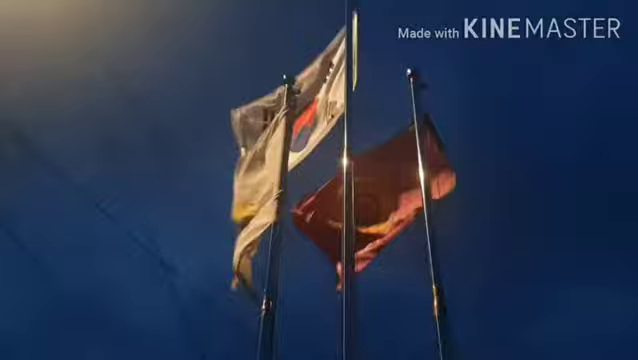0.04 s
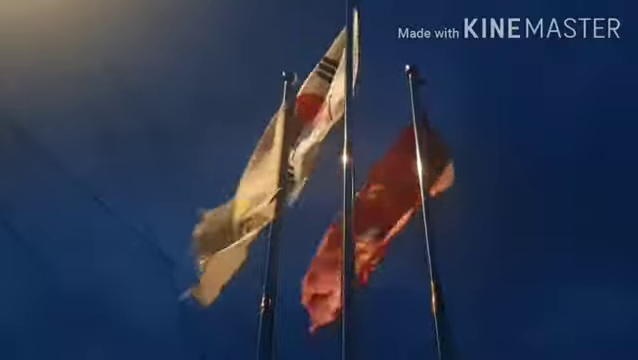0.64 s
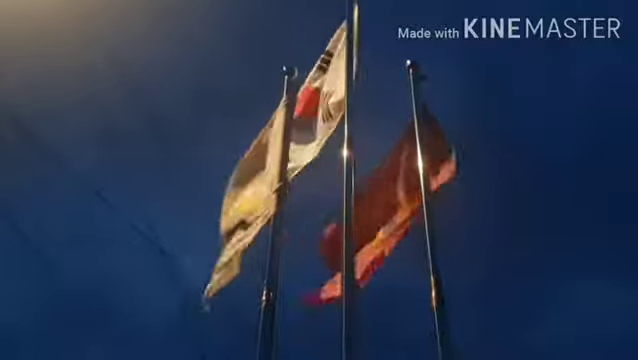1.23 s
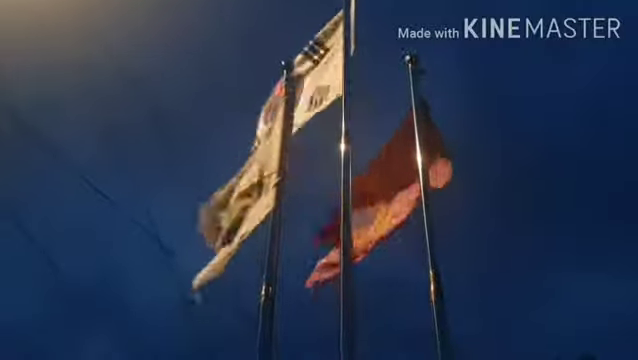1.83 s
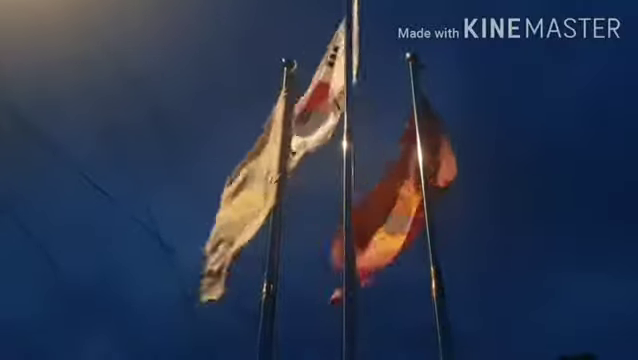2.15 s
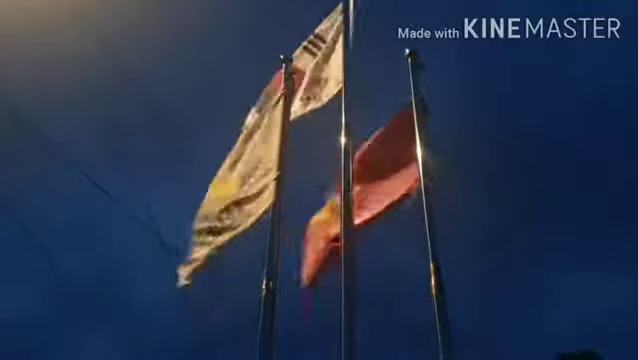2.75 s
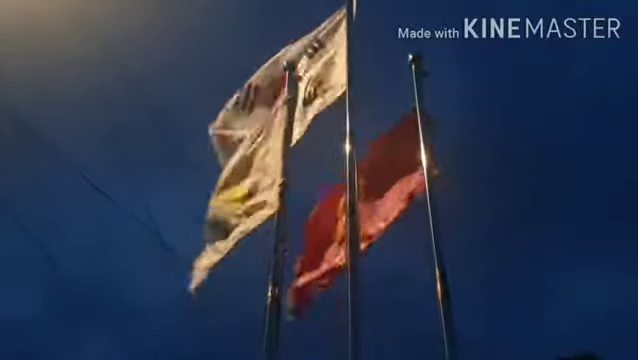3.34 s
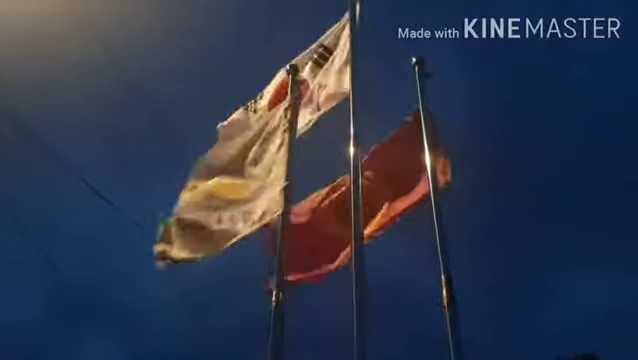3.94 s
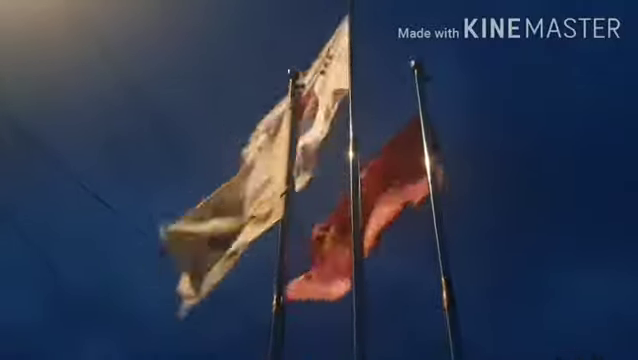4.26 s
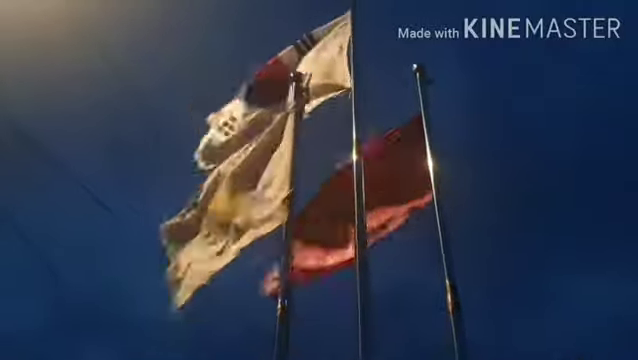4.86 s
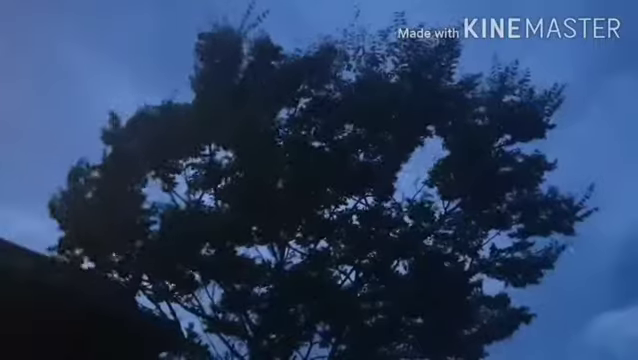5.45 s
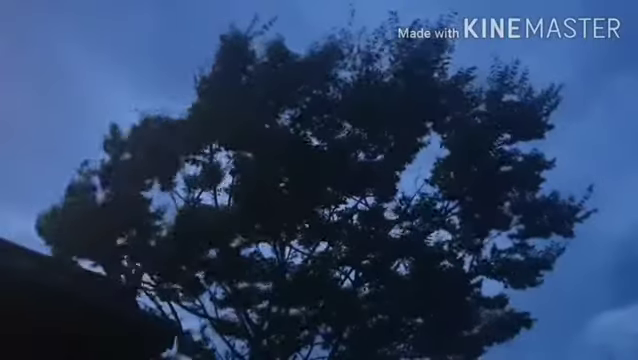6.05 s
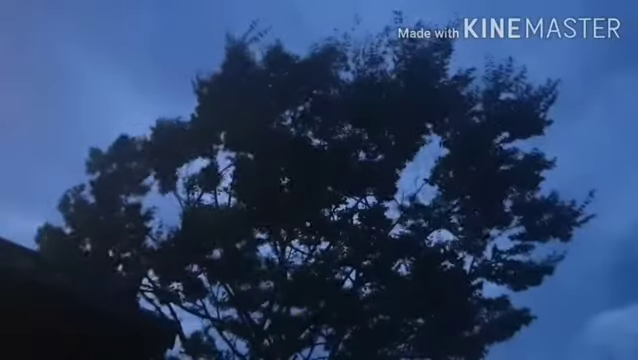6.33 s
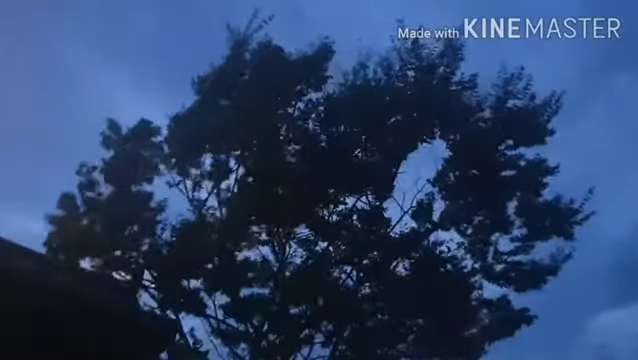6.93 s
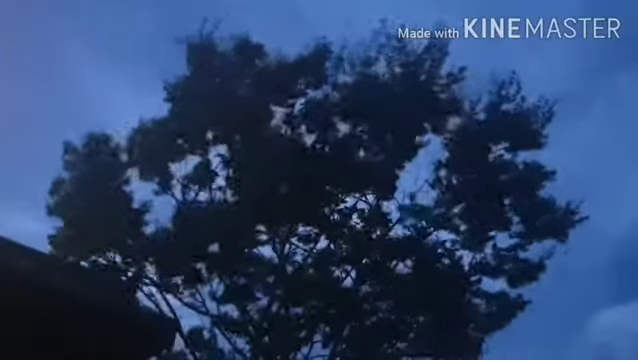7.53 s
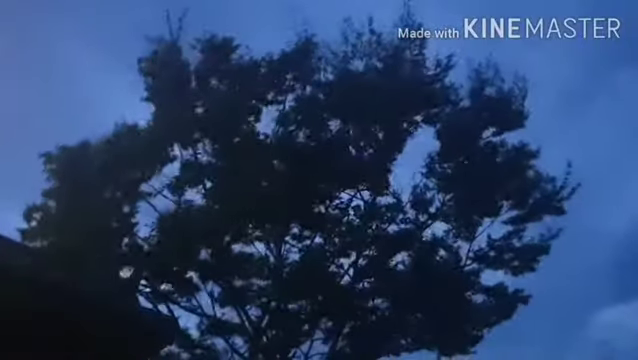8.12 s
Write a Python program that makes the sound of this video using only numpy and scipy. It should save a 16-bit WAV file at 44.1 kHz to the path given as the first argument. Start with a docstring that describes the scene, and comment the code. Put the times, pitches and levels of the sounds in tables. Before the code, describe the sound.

Outdoors under flagpoles, uneven gusts buffet the microphone with a low, fluttering rumble. Quieter clinks of clips on ringing metal poles come through, along with faint cloth swishes and rope rubbing. After a sharp double clink, the pole sounds stop abruptly and the wind briefly drops. Then the hiss of tossing leaves builds close by, under more heavy thumps of wind.

```python
"""Strong wind thumps and flutters right on the microphone, its eddies pushing at the two ports.
We stand at dusk under three flagpoles, with trees washing in the distance: cloth swishes, halyards rub,
and the flags jerk their halyard clips against the ringing metal poles.
After a cut the microphone faces a tossing tree, still in the wind, where thousands of leaves
brush each other in a bright rush that swells with the gusts."""
import sys
import numpy as np
from scipy import signal
from scipy.fft import rfft, irfft, next_fast_len
from scipy.io import wavfile
from scipy.ndimage import uniform_filter1d

SR = 44100
rng = np.random.default_rng(int(sys.argv[2]) if len(sys.argv) > 2 else 0)


def pcm_store(signal):
    """Save signal as 16-bit PCM."""
    levels = np.round(np.clip(np.atleast_2d(signal), -1, 1) * 32767)
    wavfile.write(sys.argv[1], SR, levels.astype(np.int16).T)


N = 361179
TIME = np.arange(N) / SR
START_S, CUT_S, RESUME_S = .16, 4.88, 4.885

# distant trees around the flagpoles: (time [s], relative level [dB])
FAR_TREE_LEVELS = [(.27, -71), (.5, -68), (.7, -69), (.85, -69.5), (1.6, -71), (2.0, -69), (2.15, -62.5),
                   (2.7, -63), (3.1, -64), (4, -62), (4.3, -62.5), (4.87, -62.5)]
# folds of flag sliding, halyards rubbing: (peak time [s], length [s], relative level [dB])
SWISHES = [(.48, .08, -78), (.64, 0.11, -78), (.76, 0.073, -81), (1.04, 0.091, -80), (2.66, 0.1, -66),
           (3.3, .025, -66), (3.45, 0.13, -85), (3.57, 0.066, -69), (4.19, 0.13, -72), (4.84, 0.098, -68)]
RUBS = [(2.77, .1, -69), (3.32, 0.087, -70), (3.5, .12, -81), (3.7, 0.13, -73), (3.9, 0.27, -69.5),
        (4.82, 0.059, -56.5)]
# clips striking the poles: (time [s], relative level [dB], pole ring offset [dB], chatter t60 [s])
CLIP_STRIKES = [(0.4362, -57.5, -5, 0.12), (0.609, -64, -3, .16), (0.9933, -64, -5, 0.14),
                (1.234, -63, -12, 0.1), (1.868, -68, -12, .08), (2.281, -51, -9, 0.14),
                (2.427, -46.5, 5, 0.14), (2.5986, -50.5, 8, 0.14), (2.634, -55, -6, 0.046),
                (2.728, -49.5, 7, .14), (2.762, -54, 7, 0.27), (3.148, -58, -10, .08),
                (3.2947, -58.5, -9, .14), (3.373, -49.5, -19, 0.058), (3.415, -52, -19, 0.046),
                (3.534, -52, -6, .13), (3.699, -51.5, -5, 0.2), (3.781, -55.5, -9, .14),
                (3.907, -61, -12, 0.14), (4.091, -52.5, 11, 0.19), (4.12, -50, -11, 0.052),
                (4.2557, -54, 0, .1), (4.299, -50.5, 11, .14), (4.402, -34, 7, 0.1), (4.4166, -34, 0, 0.11),
                (4.779, -46.5, 8, 0.18)]
# modes of pole and steel clip: (frequency [Hz], spread [Hz], relative level [dB], t60 [s])
POLE_MODES = [(1529, 30, -17, 1.2), (2110, 60, -11, 2.0), (3330, 50, -19, .9), (3830, 50, -13, .7),
              (3915, 42, -8, 1.0), (4060, 100, -9, .8), (6277, 28, -7, .55), (6471, 60, -10, .5),
              (9260, 90, -5, .35), (9700, 120, -8, .35)]
CLIP_MODES = [(4500, 14, -3.5, .25), (4720, 110, -9, .2), (5190, 16, -6, .22), (6520, 170, -5, .16),
              (7620, 110, -5, .1), (8090, 16, -1, .18), (9330, 130, 2.5, .16), (10300, 200, -2, .15),
              (11610, 120, -7, .1), (12728, 16, -8, .22), (13110, 130, -9, .1)]
# the tree in front of the microphone: (time [s], relative level [dB])
NEAR_TREE_LEVELS = [(4.93, -81), (4.97, -70), (5.06, -67), (5.13, -59), (5.27, -56), (5.37, -60.5),
                    (5.52, -56.5), (5.65, -52), (5.78, -55), (5.95, -53.5), (6.08, -54.5), (6.5, -51.5),
                    (6.66, -50.5), (6.73, -50.5), (6.8, -50.5), (6.87, -47.5), (7.0, -50), (7.1, -49),
                    (7.2, -53.5), (7.3, -51), (7.58, -54), (7.66, -51), (7.74, -53), (7.85, -55),
                    (8.08, -50.5), (8.19, -52.5)]
# steady wind on the microphone: (time [s], rumble [dB], buffeting [dB])
WIND_AT_FLAGS = [(.16, -50.5, -71), (.25, -37, -64), (.45, -40.5, -57), (.7, -44.5, -59.5), (.95, -39, -51),
                 (1.38, -33, -45.5), (1.6, -35, -39), (1.75, -39, -48), (2.2, -33, -41.5),
                 (2.4, -24.5, -33.5), (2.8, -31, -44), (3.0, -29, -45.5), (3.25, -31.5, -41),
                 (3.9, -34, -41.5), (4.13, -35, -45), (4.25, -27, -40.5), (4.55, -30, -39),
                 (4.75, -31.5, -49), (4.88, -34.5, -52)]
WIND_AT_TREE = [(4.93, -70, -68.5), (5.1, -61, -56), (5.35, -44.5, -50), (5.7, -39, -50.5),
                (5.95, -39, -52), (6.2, -41, -55), (6.35, -46, -56), (6.6, -29.5, -44), (6.88, -43, -46),
                (6.96, -45.5, -53), (7.25, -36.5, -52), (7.49, -42, -56), (7.65, -37, -55),
                (7.85, -37, -46), (8.08, -26.5, -41.5), (8.19, -48, -54)]
# gusts wrapping round both ports: (peak time [s], length [s], rumble [dB], buffeting [dB])
GUSTS = [(0.293, 0.092, -45, -45.5), (0.534, 0.036, -48, -46), (0.962, 0.038, -33, -44),
         (1.037, 0.03, -31.5, -50), (1.306, 0.035, -30, -36.5), (1.423, 0.041, -32.5, -31.5),
         (1.524, 0.028, -31, -35), (1.786, 0.025, -28, -42), (1.886, 0.025, -29, -44),
         (2, 0.08, -36.5, -38.5), (2.179, 0.029, -28, -39), (2.294, 0.041, -25, -23),
         (2.368, 0.027, -26.5, -25), (2.422, 0.021, -26, -34), (2.536, 0.019, -40, -23),
         (2.599, 0.1, -26, -26.5), (2.738, 0.099, -39, -30.5), (3.101, 0.05, -32, -31),
         (3.233, 0.031, -28, -30.5), (3.322, 0.016, -28.5, -45), (3.361, 0.04, -44, -31.5),
         (3.536, 0.034, -25, -38), (3.675, 0.085, -31.5, -31), (3.77, 0.087, -30.5, -31.5),
         (3.839, 0.034, -32, -35), (3.94, 0.041, -31, -34), (4.004, 0.026, -39, -31),
         (4.072, 0.026, -28.5, -31.5), (4.25, 0.025, -35, -34), (4.621, 0.023, -33, -41),
         (4.695, 0.032, -36, -34.5), (4.763, 0.021, -29, -34.5), (4.8, 0.023, -28, -38.5),
         (5.155, 0.098, -45, -56), (5.45, 0.07, -30, -45), (5.542, 0.045, -32, -44),
         (5.605, 0.03, -31.5, -46.5), (5.728, 0.053, -30.5, -38), (5.781, 0.045, -27, -30.5),
         (5.845, 0.057, -23.5, -26.5), (6.059, 0.0082, -36, -49), (6.456, 0.044, -26, -30.5),
         (6.554, 0.08, -32, -42), (6.703, 0.078, -27, -36), (6.853, 0.11, -32.5, -64),
         (7.035, 0.045, -35.5, -49), (7.151, 0.017, -46, -44), (7.268, 0.043, -43, -39.5),
         (7.413, 0.024, -47, -54), (7.545, 0.012, -35, -44), (7.602, 0.053, -53, -37),
         (7.702, 0.043, -50, -37), (7.763, 0.025, -52, -45), (7.842, 0.011, -52, -34),
         (7.941, 0.065, -49, -32.5), (8.023, 0.028, -41, -31.5), (8.112, 0.029, -20.5, -33)]
# flow tearing across the right port's edge: (start [s], length [s], relative level [dB])
TEARS = [(1.274, 0.018, -49), (1.4, 0.11, -51.5), (2.316, 0.031, -36.5), (2.371, 0.025, -33),
         (2.808, 0.15, -47.5), (4.144, 0.194, -40.5), (4.359, 0.2, -40.5), (5.767, 0.15, -55.5)]
# short rips of air at a port's edge: (start [s], length [s], level [dB], left minus right [dB])
RIPS = [(1.414, 0.0079, -58, -16), (1.486, 0.003, -47, -22), (1.494, 0.005, -45, -24),
        (1.519, .004, -52, -14), (1.803, 0.003, -54, -22), (2.309, 0.012, -42.5, -22),
        (2.331, 0.013, -39, -22), (2.37, 0.017, -39, -29), (2.412, 0.0084, -46, -22),
        (2.438, 0.0039, -36.5, -21), (2.445, 0.0061, -44.5, -22), (2.488, 0.013, -41.5, -24),
        (2.652, 0.02, -50, -15), (2.82, 0.0031, -36, -19), (2.831, 0.0097, -48, -20),
        (2.876, 0.0073, -38.5, -22), (2.893, 0.01, -40, -24), (2.934, 0.017, -47, -16),
        (3.289, 0.013, -51, -10), (3.666, 0.0027, -72, 5), (4.077, 0.011, -48, -15),
        (4.11, .006, -43.5, -9), (4.151, 0.0034, -40, -23), (4.157, 0.0068, -37, -23),
        (4.186, .003, -47, -20), (4.212, .004, -44, -16), (4.24, 0.0036, -44, -20), (4.26, .003, -41, -20),
        (4.28, 0.0048, -40, -23), (4.313, 0.011, -36.5, -25), (4.328, .008, -44, -18),
        (4.37, .004, -45, -22), (4.437, 0.0039, -52, -9), (4.447, 0.0029, -35.5, -29),
        (4.484, 0.023, -45, -24), (4.498, 0.016, -37.5, -22), (4.538, 0.014, -38.5, -14),
        (5.778, .008, -51, -3), (5.84, .008, -54, -8), (7.949, 0.0066, -55, -8), (8.024, 0.008, -43, 0)]
# single hard eddies: (time [s], relative level [dB], swing [Hz], left minus right [dB])
SHOVES = [(0.298, -26.5, 130, -4), (1.291, -27.5, 288, -2), (1.305, -24.5, 113, -3), (1.429, -23.5, 320, 9),
          (1.457, -17.5, 120, 4), (1.489, -26, 600, -14), (1.519, -25.5, 276, -2), (1.893, -26, 135, -5),
          (1.92, -23.5, 332, -3), (2.285, -20, 486, 3), (2.293, -26, 61, -13), (2.313, -16, 49, 5),
          (2.412, -17, 77, 4), (2.525, -12.5, 215, 3), (2.726, -18.5, 234, -4), (3.209, -22, 376, -19),
          (3.258, -24, 59.3, 1), (3.4, -20, 283, 3), (3.521, -38, 73.4, -13), (3.664, -20.5, 402, -2.5),
          (3.756, -32, 90, -8), (3.765, -26, 360, -5), (3.92, -28, 121, 0.5), (3.937, -27, 315, -10),
          (4.084, -15, 460, -32), (4.226, -19, 350, -18), (4.669, -20.5, 276, -2),
          (5.778, -11.5, 227, -1.5), (5.78, -14, 121, -13), (5.78, -22.5, 540, 4), (5.83, -23, 325, -3),
          (5.844, -16.5, 470, -6), (5.856, -14, 54.4, -1), (6.454, -36, 238, -4), (6.461, -26.5, 260, 5),
          (6.472, -21, 228, -1), (6.738, -25, 60.4, -1), (6.802, -17.5, 72, 0), (7.051, -30.5, 53.3, -3),
          (7.229, -34, 107, -19), (7.943, -23, 406, 3), (8.1, -18.5, 197, -4), (8.106, -18.5, 126, 4),
          (8.12, -20.5, 169, 4)]
# spectra as heard at the microphone: (frequency [Hz], relative level [dB])
FAR_TREE_TONE = [(30, -3.5), (400, 25.5), (900, 15.5), (1500, 7), (1900, -0.5), (2100, 1), (2700, -4),
                 (6000, -4.5), (7500, -2.5), (8300, -1.5), (10500, -3), (12500, -8.5), (15500, -20)]
CLOTH_TONE = [(700, -20), (1500, -4), (2700, 2), (3400, -3), (3800, -4), (5000, -3), (7000, -19),
              (12000, -14)]
RUB_TONE = [(1700, -40), (1980, -14), (2060, 0), (2170, -1), (2330, -10), (2500, -35), (3650, -35),
            (3830, -15), (4100, -13), (4300, -40)]
CHATTER_TONE = [(1000, -5.5), (3000, -6.5), (4400, -10.5), (5200, -8), (7000, -6.5), (9500, -5.5),
                (11500, -7.5), (13500, -15), (15500, -27)]
LEAF_TONE = [(600, 3.5), (1200, 3), (1900, -24), (2400, 0), (3200, -3), (5000, -1.5), (6200, 2.5),
             (7200, 1), (8300, 4.5), (9500, 2.2), (11800, 1), (14000, -5.5), (15500, -9.5)]
CROWN_TONE = [(40, 8), (300, -18), (700, 1.5), (1100, -7), (1600, -2), (2500, -1.5), (5000, -3.5),
              (12000, -40)]
RIP_TONE = [(150, -29), (400, 13), (900, 11), (1500, 5), (2200, -2.5), (3200, -14.5), (5000, -25),
            (10000, -50)]
RUMBLE_TONE = [(15, -17), (30, -13), (55, 1), (85, -1), (140, -5), (200, -11), (280, -21), (500, -52),
               (1000, -51), (4000, -120)]
SOFT_BUFFET_TONE = [(40, -16), (110, -37), (170, -1.5), (250, 2), (400, 1.5), (600, -11), (850, -19.5),
                    (1300, -36.5), (2200, -46.5), (5000, -70), (12000, -105)]
HARD_BUFFET_TONE = [(40, -35), (110, 2), (180, 4.5), (270, 4.5), (420, 1.5), (600, -8.5), (800, -19),
                    (1200, -31.5), (2200, -50), (5000, -63), (12000, -105)]
TEAR_TONE = [(150, -35), (280, -11), (400, 14.5), (650, 9.5), (1000, -1.5), (1500, -11), (2200, -19),
             (3200, -29.5), (5000, -36), (10000, -56)]


def gain_of(db):
    """Decibels to amplitude."""
    return 10 ** (np.asarray(db) / 20)


def unit_rms(x):
    """Scales to an rms of 1."""
    return x / np.sqrt(np.mean(x ** 2) + 1e-20)


def follow(rows):
    """The columns of a curve at every sample."""
    times, *columns = np.transpose(rows)
    return [np.interp(TIME, times, column) for column in columns]


def swells(rows):
    """A gain that rises and falls once for each row of (peak time [s], length [s], level [dB])."""
    return sum(gain_of(db) * np.exp(-(2 * (TIME - at) / length) ** 2) for at, length, db in rows)


def add(mix, at, sound):
    """Mixes a sound in, starting at the given second."""
    part = mix[:, max(round(at * SR), 0):][:, :sound.shape[1]]
    part += sound[:, :part.shape[1]]


def pan(left_db):
    """Left and right gains of constant power."""
    ratio = gain_of(np.atleast_1d(left_db))
    return np.array([ratio, np.ones_like(ratio)]) * np.sqrt(2 / (1 + ratio ** 2))


def colour(x, tone):
    """Gives x a spectrum drawn on a log-frequency axis."""
    size = next_fast_len(x.shape[-1])
    hz, db = np.transpose(tone)
    shape_db = np.interp(np.log(np.fft.rfftfreq(size, 1 / SR) + 1), np.log(hz), db)
    return irfft(rfft(x, size) * gain_of(shape_db), size)[..., :x.shape[-1]]


def noise(tone):
    """Coloured noise, unrelated on the two ports."""
    return unit_rms(colour(rng.standard_normal((2, N)), tone))


def wander(hz, channels=2):
    """A random drift of unit rms that turns about hz times a second."""
    knots = rng.standard_normal((channels, 20000))
    return unit_rms(np.array([np.interp(TIME * hz, np.arange(len(k)), k) for k in knots]))


def far_trees():
    """Wind in the distant trees: a smooth wash behind the flagpoles, fading in at the start."""
    fade_in = np.clip((TIME - START_S + 0.02) / 0.17, 0, 1)
    flicker_db = .7 * wander(30, channels=1)
    level_db = follow(FAR_TREE_LEVELS)[0] + 10.0 + flicker_db
    return noise(FAR_TREE_TONE) * fade_in * gain_of(level_db) * pan(-2.0)


def flag_cloth():
    """Overhead, folds slide over each other in grainy swishes and creases flick faintly with the wind."""
    creases = rng.standard_normal((2, N)) * gain_of(2.5 * wander(260))
    flicker_db = 5 * np.clip(wander(40, channels=1), -2, 2)
    flicks = gain_of(follow(FAR_TREE_LEVELS)[0] - 13 + flicker_db)
    return unit_rms(colour(creases, CLOTH_TONE)) * (swells(SWISHES) + flicks) * pan(-1.1)


def halyard_rubs():
    """A taut halyard rubs along its pole and makes the tube sing hoarsely."""
    grip = gain_of(2.5 * wander(45))
    return noise(RUB_TONE) * grip * swells(RUBS) * pan(-1.5)


def metal_ring(modes, t, rise_s, partials=14):
    """One blow on metal: the close partials of each mode build up and beat, differently at each port."""
    hz, spread, db, t60 = np.transpose(modes)[:, :, None]
    slow_t = t[::48]  # the beating is slow enough for a coarse time grid
    out = np.zeros((2, len(t)))
    detune, phase = rng.standard_normal((2, len(modes), 2, partials, 1))
    turns = spread[:, :, None, None] * detune * slow_t + phase
    beats = np.exp(2j * np.pi * turns).sum(2) / np.sqrt(partials)
    envelopes = beats * gain_of(db - 60 * slow_t / t60)[:, None]
    for mode_hz, pair in zip(hz, envelopes):
        carrier = np.exp(2j * np.pi * mode_hz * t)
        out += [(np.interp(t, slow_t, envelope) * carrier).real for envelope in pair]
    fade_out = np.minimum(10 * (1 - t / t[-1]), 1)
    return out * (1 - np.exp(-t / rise_s)) * fade_out


def halyard_clips():
    """Each clip chatters on its pole and rings briefly; the tube sings on; the yard adds a short tail."""
    t = np.arange(SR * 5 // 8) / SR
    ticks, rings = np.zeros((2, N)), np.zeros((2, N))
    yard_tail = gain_of(1.5 - 60 * t / 0.41)
    attack = 1 - np.exp(-t / 0.00028)
    bounces = gain_of(2.5 * wander(350, channels=1))
    for at, db, pole_db, chatter_t60 in CLIP_STRIKES:
        chatter = gain_of(-60 * t / chatter_t60) * bounces[:, round(at * SR):][:, :len(t)]
        strike = attack * (chatter + np.sqrt(chatter_t60) * yard_tail)
        add(ticks, at, gain_of(db) * strike * rng.standard_normal((2, len(t))))
        add(rings, at, gain_of(db + pole_db) * metal_ring(POLE_MODES, t, rise_s=.065))
        add(rings, at, gain_of(db) * metal_ring(CLIP_MODES, t[:SR // 5], rise_s=.001))
    # loose fittings rattle against the ringing tube
    rattle = unit_rms(gain_of(2.5 * wander(35) + 3.5 * wander(260)))
    return (gain_of(1.2) * colour(ticks, CHATTER_TONE) + gain_of(-13) * rings * rattle) * pan(-1.8)


def grainy(x, depth_db=2.2):
    """Random patches of the spectrum swell and dip for some 30 ms, making the rush grainy."""
    spectra = signal.stft(x, nperseg=512)[2]
    bands = uniform_filter1d(rng.standard_normal(spectra.shape), size=6, axis=1)
    patches = unit_rms(uniform_filter1d(bands, size=5, axis=2))
    return signal.istft(spectra * gain_of(depth_db * patches), nperseg=512)[1][:, :N]


def near_tree(contacts_per_s=1800):
    """In front of the microphone, countless leaves touch over the duller rush of air through the crown."""
    toss_db = 0.5 * wander(16, channels=1)  # branches toss in and out of the wind
    level_db = follow(NEAR_TREE_LEVELS)[0] + toss_db
    contacts = (rng.random((2, N)) < contacts_per_s / SR) * rng.standard_normal((2, N))
    blur = rng.standard_normal((2, N))  # all the contacts too faint to tell apart
    hiss = colour(0.65 * unit_rms(contacts) + blur, LEAF_TONE)
    leaves = unit_rms(hiss) * gain_of(4.0 + .7 * wander(55))
    rush = noise(CROWN_TONE) * gain_of(-2 + 2.9 * wander(22))
    return grainy(leaves + rush) * gain_of(level_db) * pan(-0.59)


def eddies(tone, lump_hz, lump_db, steady_s, shared=0):
    """Turbulence: pressure comes in lumps, each port meeting its own and any share of the other's."""
    lumps = rng.standard_normal((2, N)) * gain_of(lump_db * np.clip(wander(lump_hz), -2, 2))
    pressure = colour(lumps + shared * lumps[::-1], tone)
    # hold the power even over spans longer than steady_s, keeping the faster lumps
    size = int(steady_s * SR)
    power = uniform_filter1d(uniform_filter1d(pressure ** 2, size), size)
    return pressure / np.sqrt(abs(power) + 1e-9)


def port_rips(rise_s=0.0006, fall_s=0.006):
    """Air rips at the edge of a port: a ragged run of pressure spurts, a few milliseconds apart."""
    air = eddies(RIP_TONE, lump_hz=484, lump_db=4.5, steady_s=0.011)
    t, out = np.arange(SR // 16) / SR, np.zeros((2, N))
    for at, length, db, left_db in RIPS:
        envelope = np.interp(t, [0, rise_s, length, length + fall_s], [0, 1, 1, 0])
        spurt = air[:, round(at * SR):][:, :len(t)] * envelope
        add(out, at, spurt * gain_of(db) * pan(left_db))
    return out


def diaphragm_shoves(cycles_to_peak=0.69, trim_db=-3.43, port_low_hz=31.7):
    """Single eddies push both diaphragms the same way; they snap and swing back once or twice."""
    t, out = np.arange(SR // 8) / SR, np.zeros((2, N))
    for at, db, hz, left_db in SHOVES:
        turns = hz * rng.uniform(.86, 1.16, (2, 1)) * t
        sign = rng.choice([-1, 1])
        for ratio, part_db in (1, 0), (2.03, -13):  # the steep front adds a quicker, shorter swing
            age = ratio * turns / cycles_to_peak
            swing = sign * np.sin(2 * np.pi * ratio * turns) * age * np.exp(1 - age)
            add(out, at, swing * gain_of(db + part_db + trim_db) * pan(left_db))
    # the ports shut out the slowest pushes
    return signal.sosfilt(signal.butter(2, port_low_hz, 'highpass', fs=SR, output='sos'), out)


def wind_gains(surge_hz=16, weak_side_db=-26, gust_rise=0.37, gust_fall=0.57):
    """Rumble and buffeting gains: the steady wind surges at random, gusts swell and fade on both ports."""
    rumble_db, buffet_db = follow(WIND_AT_FLAGS + WIND_AT_TREE)
    # steady rumble is mostly in the left channel at the flags, the right at the tree
    weak_side = np.array([TIME > CUT_S, TIME <= CUT_S])
    side_db = weak_side * (weak_side_db + 10.5 * wander(surge_hz))
    rumble_power = gain_of(rumble_db + side_db + 3 * wander(surge_hz, channels=1)) ** 2
    buffet_power = gain_of(buffet_db + 3.5 * wander(surge_hz, channels=1)) ** 2
    t = np.arange(-SR // 5, SR // 3) / SR
    for at, length, gust_rumble_db, gust_buffet_db in GUSTS:
        width_s = length * np.where(t < 0, gust_rise, gust_fall)
        swell = np.exp(-(t / width_s) ** 2)[None]
        add(rumble_power, at + t[0], swell * gain_of(gust_rumble_db) ** 2)
        add(buffet_power, at + t[0], swell * gain_of(gust_buffet_db) ** 2)
    return np.sqrt(rumble_power), np.sqrt(buffet_power)


def port_tearing(rise_s=0.0081, fall_s=0.02):
    """The flow tears across the edge of the right port; the left one barely hears it."""
    envelope = sum(gain_of(db) * np.interp(TIME - at, [0, rise_s, length, length + fall_s], [0, 1, 1, 0])
                   for at, length, db in TEARS)
    air = eddies(TEAR_TONE, lump_hz=229.6, lump_db=4.5, steady_s=0.022)
    return air * envelope * gain_of([[-13], [7]])


def wind_on_microphone():
    """Right at the ports, large eddies rumble and small ones buffet."""
    rumble_gain, buffet_gain = wind_gains()
    rumble = eddies(RUMBLE_TONE, lump_hz=59.45, lump_db=5.0, steady_s=0.051, shared=0.047)
    hardness = np.clip((20 * np.log10(buffet_gain) + 38.7) / 14, 0, 1)  # faster air sheds finer eddies
    soft = eddies(SOFT_BUFFET_TONE, lump_hz=90.56, lump_db=6.5, steady_s=0.07) * np.sqrt(1 - hardness)
    hard = eddies(HARD_BUFFET_TONE, lump_hz=112.9, lump_db=8.5, steady_s=0.02) * np.sqrt(hardness)
    return rumble * rumble_gain + (soft + hard) * buffet_gain * pan(-2.2)


def scene():
    """Under the flagpoles, a cut, then in front of the tree; wind on the microphone in both places."""
    air = wind_on_microphone() + port_tearing() + diaphragm_shoves() + port_rips()
    yard = halyard_clips() + halyard_rubs() + flag_cloth() + far_trees()
    at_flags = np.clip((TIME - START_S) / .005, 0, 1) * np.clip((CUT_S - TIME) / .002, 0, 1)
    at_tree = np.clip((TIME - RESUME_S) / .06, 0, 1)
    return at_flags * (air + yard) + at_tree * (air + near_tree())


def record(dry):
    """The recorder passes nothing much above 15.5 kHz."""
    lowpass = signal.firwin(511, 15500, window=("kaiser", 9), fs=SR)
    return signal.oaconvolve(dry, lowpass[None], "same")


dry = scene()
out = record(dry)
pcm_store(out)
```